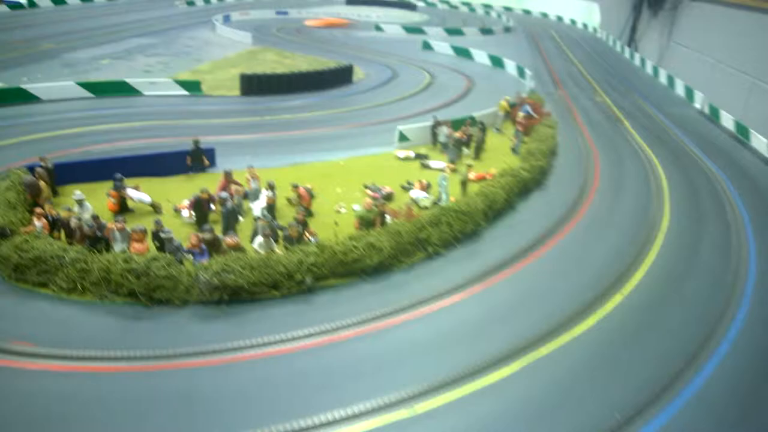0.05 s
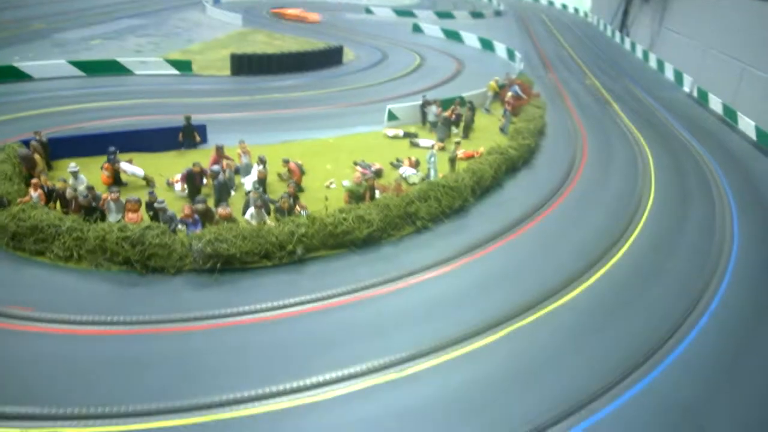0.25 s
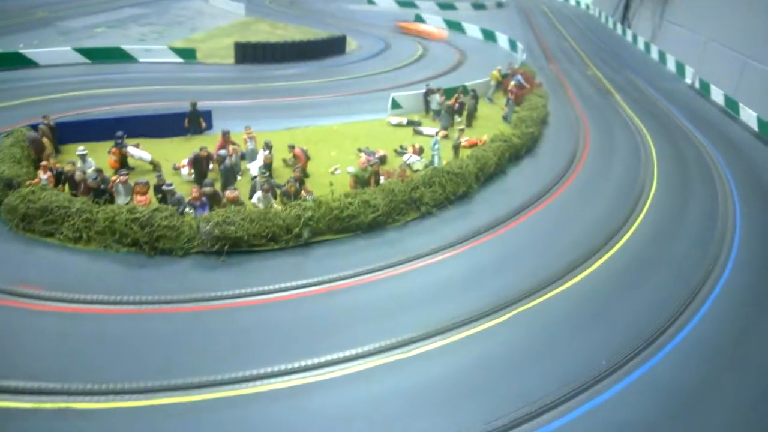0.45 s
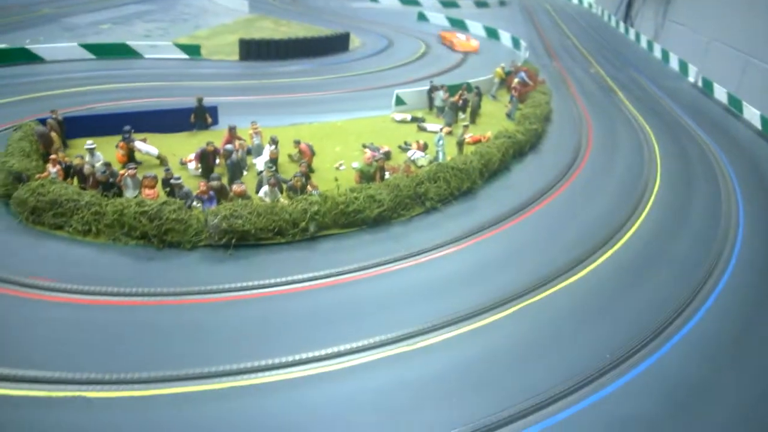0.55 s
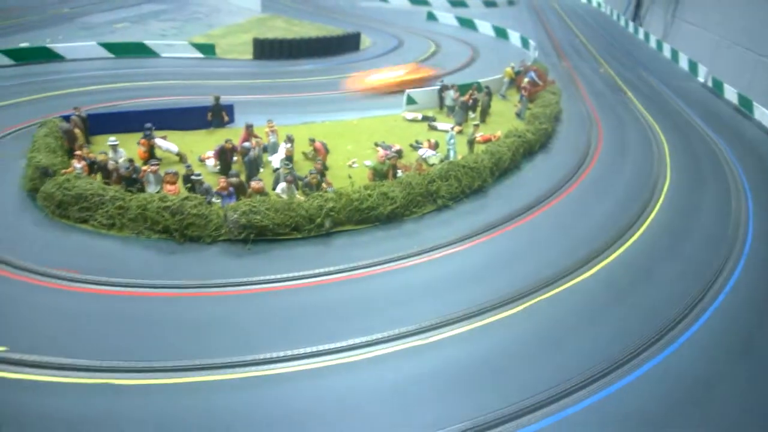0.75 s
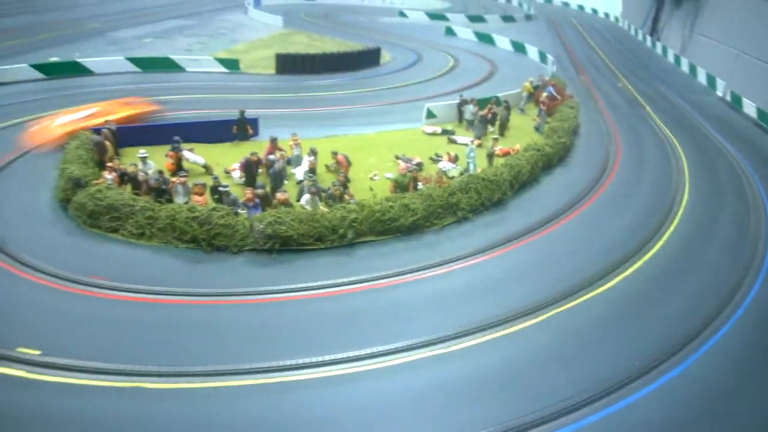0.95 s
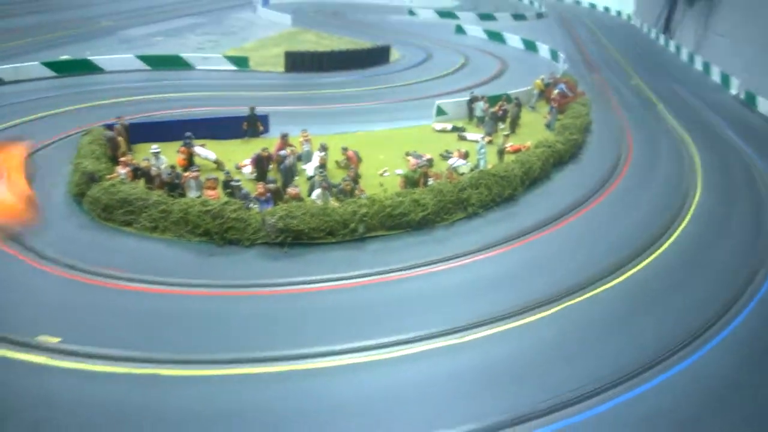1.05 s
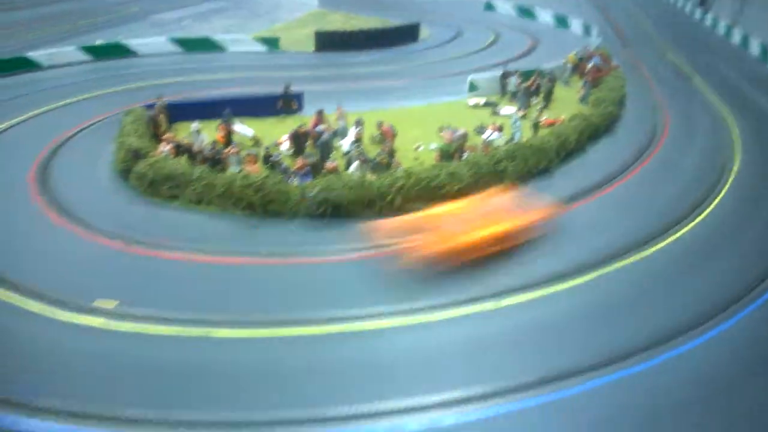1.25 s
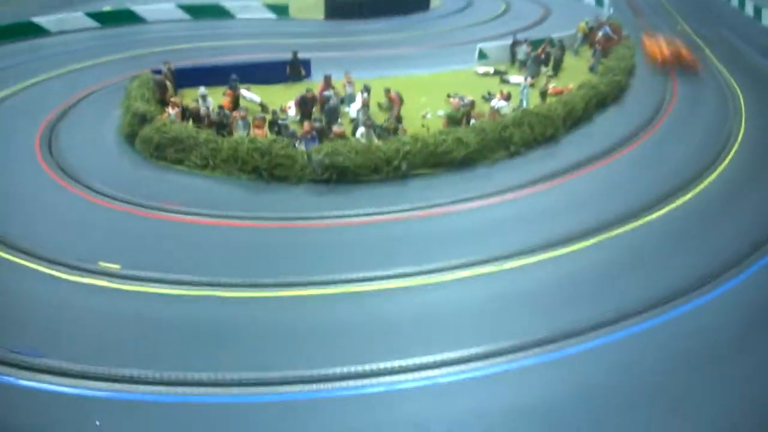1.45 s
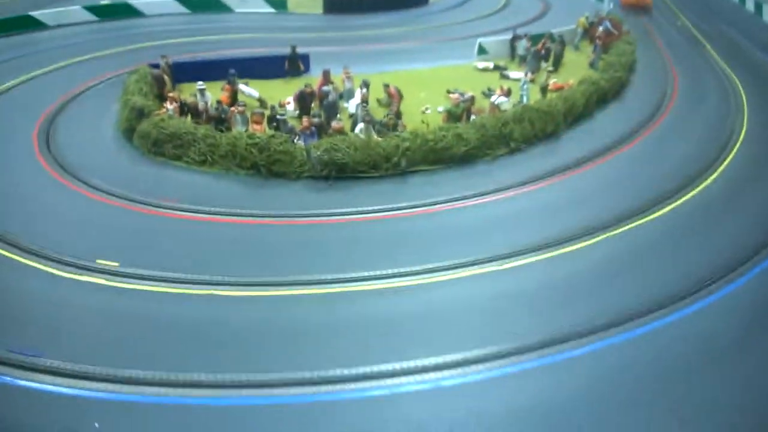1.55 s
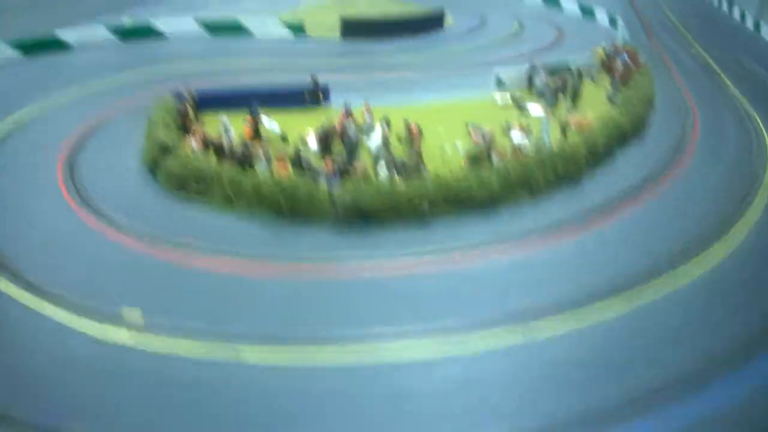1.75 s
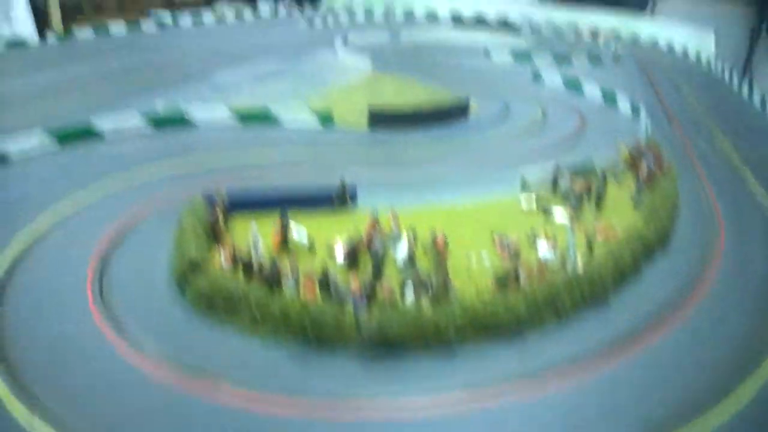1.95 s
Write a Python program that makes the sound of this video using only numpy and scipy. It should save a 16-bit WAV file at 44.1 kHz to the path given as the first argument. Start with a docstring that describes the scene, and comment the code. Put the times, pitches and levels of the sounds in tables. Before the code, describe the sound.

A toy slot car whirs and rattles along a model track in a small room, over a low hum. Its whine rises at first, dips around 0.5 seconds and again near 1 second, with tiny squeaks. From about 1.2 to 1.6 seconds it speeds close past the microphone, loudest here, with a scraping hiss and quick clicks at the track joints. It then drops in pitch and fades by 2 seconds.

```python
"""A toy slot car whines and rattles round a model track, slowing for the bends and rushing
close past a mono microphone in a small room. Its gear teeth sing and ring the plastic chassis,
the pickup braids scrape along the rails, the guide clatters at the track joints and the wheels
rumble on the hollow board. Behind the car lie a deep hum and the faint air of the room."""
import sys
import numpy as np
from scipy import signal
from scipy.fft import rfft, irfft
from scipy.io import wavfile

SR = 44100
rng = np.random.default_rng(int(sys.argv[2]) if len(sys.argv) > 2 else 0)


def waveform_to_disk(signal):
    """Save audio, clipped to [-1, 1], as 16-bit WAV at the path in sys.argv[1]."""
    frames = np.transpose(np.atleast_2d(signal))
    scaled = np.clip(frames, -1, 1) * 32767
    samples = np.round(scaled).astype(np.int16)
    wavfile.write(sys.argv[1], SR, samples)


N = 88200
T = np.arange(N) / SR

# motor speed along the lap (time [s], tooth rate [Hz])
TOOTH_RATE = [(0, 1420), (.13, 1950), (.33, 1647), (.47, 1146), (.52, 976), (.59, 1020), (.68, 1246),
              (.8, 1417), (.88, 1475), (.91, 1144), (.97, 1030), (1.04, 1304), (1.18, 1347), (1.25, 1538),
              (1.36, 1696), (1.46, 2069), (1.55, 1641), (1.655, 1561), (1.69, 1316), (1.78, 1064),
              (1.93, 1030), (2, 1038)]
# the car's rattle at the microphone (time [s], low ring [dB], high ring [dB], rasp [dB])
RATTLE_LEVELS = [(0, -46.5, -42.5, -46.5), (.11, -49, -52, -48.5), (.2, -47.5, -43, -47.5),
                 (.31, -52.5, -49, -47.5), (.36, -38, -49, -42), (.42, -49, -46, -43.5),
                 (.47, -54, -50, -58), (.54, -53, -56, -55), (.58, -53, -46, -55), (.63, -44.5, -46, -43),
                 (.76, -43.5, -46, -44.5), (.84, -44.5, -41.5, -41), (.9, -46.5, -51, -47),
                 (.95, -52, -53, -44.5), (1.02, -40.5, -40, -44.5), (1.1, -37.5, -42, -35),
                 (1.15, -39.5, -57, -34), (1.22, -32.5, -30.5, -33.5), (1.3, -33, -32.5, -41.5),
                 (1.38, -34, -33, -35.5), (1.44, -33, -34.5, -36.5), (1.51, -40, -49.5, -32.5),
                 (1.6, -43, -35, -39), (1.68, -41.5, -49.5, -44.5), (1.77, -50, -38.5, -50),
                 (1.8, -47, -50, -63), (1.88, -47.5, -48, -50), (2, -52.5, -52, -48.5)]
# chassis resonances (frequency before shift [Hz], width [Hz], relative level [dB])
CHASSIS_MODES = [(1814, 770, -7), (3395, 280, 0.5), (3737, 490, 2.5), (6345, 525, 7), (6770, 510, -2),
                 (8930, 480, -2), (12500, 490, -7.5)]
# their shift as the car turns towards the microphone and away (time [s], factor [ratio])
MODE_SHIFT = [(0, 1), (.3, 0.99), (.6, 0.98), (.72, 0.97), (.84, 1.015), (.95, 1.05), (1.08, 1),
              (1.23, 1.05), (1.32, 0.983), (1.43, 1.005), (1.6, 0.972), (1.76, 1.02), (2, .98)]
# rasp through the shell (frequency [Hz], relative level [dB])
SHELL_SPECTRUM = [(200, -61), (800, -21), (1150, 2.5), (2100, 5), (2800, 8.5), (3600, -1), (4500, 10),
                  (5300, 10), (6500, -4), (8000, 9), (10500, -9.5), (16000, -42)]
# chirps of loose parts (frequency [Hz], relative level [dB])
CHIRP_SPECTRUM = [(1800, -13.5), (2800, -2), (3900, -12), (4600, -0.5), (5300, -5), (5700, -5.5),
                  (6500, 4.5), (7300, -1), (8200, -7), (9300, 1.5)]
# gear whine (time [s], tooth tone [dB], octave [dB], third harmonic [dB])
WHINE_LEVELS = [(0, -60, -79, -73), (.29, -57, -81, -76), (.42, -72, -76, -68), (.48, -52.5, -68, -67),
                (.56, -69, -64, -66), (.61, -44, -54.5, -45), (.7, -55.5, -57, -65), (.85, -51, -54, -72),
                (.91, -46.5, -63, -78), (.97, -49.5, -45, -41.5), (1.1, -48, -49, -76),
                (1.19, -43, -41, -36), (1.26, -40.5, -73, -48), (1.37, -41.5, -52, -38),
                (1.5, -89, -56, -47), (1.64, -83.5, -40.5, -67), (1.7, -51, -43.5, -55),
                (1.77, -82, -50.5, -51), (1.82, -65, -60, -66), (2, -78, -55, -55)]
# thin fourth harmonic as the car coasts away (time [s], level [dB])
COAST_LEVEL = [(0, -66), (1.75, -97), (1.82, -51.5), (2, -49.5)]
# chassis squeals (middle [s], half length [s], pitch [Hz], level [dB])
SQUEAL_EVENTS = [(.415, .028, 5110, -47), (.612, 0.0038, 6280, -36.5), (0.686, 0.0078, 6590, -37.5),
                 (0.737, 0.019, 6640, -41), (0.81, .008, 7100, -38.5), (1.07, 0.024, 6690, -37),
                 (1.17, 0.006, 6500, -33.5), (1.208, .008, 7170, -47), (1.227, .008, 6510, -29.5),
                 (1.332, .008, 6290, -31), (1.346, 0.0068, 1700, -34), (1.387, 0.0029, 3565, -27.5),
                 (1.422, 0.019, 3766, -32), (1.455, 0.016, 6480, -30), (1.49, 0.002, 6460, -21.5),
                 (1.539, 0.0029, 6420, -32.5), (1.574, 0.015, 3300, -34.5), (1.582, 0.02, 2690, -37.5),
                 (1.625, 0.017, 6130, -36)]
# braids scraping the rails (time [s], level before trim [dB])
SCRAPE_LEVEL = [(0, -40), (.14, -47.5), (.35, -45), (.43, -39.5), (.48, -52.5), (.55, -44.5), (.61, -40.5),
                (.77, -45), (.805, -35.5), (.845, -28.5), (.885, -41), (.95, -52), (1.04, -48), (1.16, -37),
                (1.25, -26.5), (1.31, -44), (1.38, -27), (1.52, -35), (1.64, -43), (1.72, -41), (2, -42.5)]
# colour of that scrape (frequency [Hz], relative level [dB])
SCRAPE_SPECTRUM = [(300, -31.5), (2000, -28), (5000, -8), (8100, -4), (9300, -4), (10300, 0), (11700, 0.5),
                   (13000, -2.5), (14500, -10), (16000, 1)]
# sizzle of the braids close to the microphone (time [s], level [dB])
SIZZLE_LEVEL = [(0, -57), (.2, -59), (.38, -46), (.48, -78), (.62, -52), (.84, -45), (.885, -51),
                (.94, -50.5), (1.01, -47), (1.15, -45), (1.24, -30.5), (1.31, -23.5), (1.37, -38.5),
                (1.5, -40.5), (1.64, -40), (1.72, -65), (2, -68)]
# colour of that sizzle (frequency [Hz], relative level [dB])
SIZZLE_SPECTRUM = [(300, -60), (9500, -11), (11500, -3), (13000, 0), (14500, 1), (16000, -8.5)]
# clatter at the track joints (time [s], length [s], chassis ring [dB], scrape [dB])
JOINT_EVENTS = [(0.2407, 0.0096, -35, -51), (0.2933, 0.0078, -35, -43), (0.331, 0.012, -39.5, -40),
                (.8061, 0.008, -58, -41), (1.0675, 0.0081, -38, -53), (1.1674, .012, -36, -60),
                (1.296, 0.0084, -42, -20), (1.3806, .007, -28.5, -52), (1.4142, 0.0065, -27, -43),
                (1.4466, 0.014, -30, -38), (1.487, 0.0037, -26.5, -31), (1.513, 0.0047, -27.5, -30),
                (1.557, 0.004, -32, -55), (1.766, .012, -42.5, -59)]
# rumble of the track board (time [s], level before trim [dB])
RUMBLE_LEVEL = [(0, -55.5), (.12, -52), (.24, -57), (.33, -50), (.39, -40.5), (.46, -58), (.53, -70),
                (.62, -50), (.76, -55.5), (.85, -61.5), (.93, -49.5), (1.05, -53), (1.2, -50), (1.45, -55),
                (1.58, -45.5), (1.64, -52.5), (1.7, -44.5), (1.8, -55.5), (2, -58)]
# colour of the board (frequency [Hz], relative level [dB])
BOARD_SPECTRUM = [(30, -16), (70, -10.5), (140, 2), (200, -9.5), (270, -10), (340, -4.5), (480, -15),
                  (700, -13), (1000, -11), (1500, -13.5), (3000, -28), (16000, -83)]
# wheels knocking on the board (time [s], pitch [Hz], width [Hz], level [dB])
WHEEL_KNOCKS = [(0.034, 175, 12, -43), (0.237, 1740, 900, -42.5), (0.288, 1630, 460, -40),
                (0.347, 153, 63, -40.5), (.378, 280, 220, -46), (0.427, 146, 80, -44.5),
                (0.719, 102, 37, -49), (1.541, 274, 70, -41.5), (1.576, 834, 580, -38.5),
                (1.678, 1295, 620, -41), (1.719, 138, 23, -46.5)]
# decay of the small room (frequency [Hz], time to fall 60 dB [s])
ROOM_DECAY = [(100, 0.43), (1000, 0.51), (5000, 0.78), (16000, 0.42)]
# deep hum behind the car (time [s], level [dB])
HUM_LEVEL = [(0, -44), (.1, -47.5), (.26, -39), (.38, -45), (.46, -42.5), (.52, -43.5), (.65, -42),
             (1, -43.5), (1.15, -50), (1.38, -41.5), (1.6, -51.5), (1.74, -44.5), (2, -46)]
# air of the room (frequency [Hz], relative level [dB])
AIR_SPECTRUM = [(20, -8), (60, 5.5), (130, -1.5), (220, -6), (500, -12.5), (1500, -23.5), (6000, -49.5),
                (16000, -26)]


def gears(cycles, teeth=9, lope=0.048, blow_share=0.2, surge_hz=45, chirp_db=-1.5):
    """Each tooth strikes and rubs: both ring the chassis, and the rubbing rasps through the shell."""
    blows = tooth_blows(cycles)
    rub = unit(grains(per_s=9000, spread_db=2) * (1 + np.exp(-(cycles % 1) * 2)))
    drive = np.sqrt(blow_share) * blows + np.sqrt(1 - blow_share) * rub
    low_ring = chassis(drive * surge(depth_db=3, hz=surge_hz), CHASSIS_MODES[:3])
    high_ring = chassis(drive * surge(depth_db=3, hz=surge_hz), CHASSIS_MODES[3:])
    rasp = unit(colour(rub, SHELL_SPECTRUM) + amp(chirp_db) * chirps())
    rattle = sum(amp(curve(RATTLE_LEVELS, column)) * layer
                 for column, layer in enumerate([low_ring, high_ring, rasp], 1))
    swell = 1 + lope * np.sin(2 * np.pi * cycles / teeth)  # once per turn of the gear
    return swell * surge(depth_db=0.32, hz=surge_hz) * rattle


def tooth_blows(cycles, spread_db=1.5):
    """One uneven blow per tooth, shared between the two nearest samples."""
    tooth = cycles.astype(int)
    at = np.flatnonzero(np.diff(tooth))
    late = (tooth[at + 1] - cycles[at]) / (cycles[at + 1] - cycles[at])
    size = amp(-spread_db * rng.uniform(-1, 1, len(at)))
    blows = np.bincount(at, size * (1 - late), N) + np.bincount(at + 1, size * late, N)
    return unit(blows - blows.mean())


def chassis(x, modes=CHASSIS_MODES, skirt=4.5):
    """The plastic body rings; a second, wider filter keeps the valleys between resonances dark."""
    shift, out = curve(MODE_SHIFT), np.zeros(N)
    for hz, width, db in modes:
        ring = resonate(x, hz * shift, width)
        out += amp(db) * resonate(ring, hz * shift, width * skirt)
    return unit(out)


def chirps(per_s=490, half_s=0.0017, glide_per_s=1.4):
    """Loose parts sing for a few milliseconds each, at scattered pitches."""
    t = np.arange(-1000, 1000) / SR
    envelope = np.exp(-(t / half_s) ** 2 / 2)
    lowest, highest = CHIRP_SPECTRUM[0][0], CHIRP_SPECTRUM[-1][0]
    out = np.zeros(N + len(t))
    for when, pitch, size in rng.random((int(per_s * N / SR), 3)):
        hz, at = lowest + pitch * (highest - lowest), int(when * N)
        tone = np.sin(2 * np.pi * hz * t * (1 + glide_per_s * t))
        out[at:at + len(t)] += (0.5 + size) * amp(read(CHIRP_SPECTRUM, hz)) * envelope * tone
    return unit(out[len(t) // 2:][:N])


def whine(cycles, steady_cycles, flutter=0.92, coast_flutter=0.78, flutter_hz=83.5):
    """The tooth tone and its overtones flutter as the car shakes."""
    fourth = np.sin(8 * np.pi * steady_cycles) * (1 + coast_flutter * drift(flutter_hz))
    out = amp(curve(COAST_LEVEL)) * unit(fourth)
    for harmonic in (1, 2, 3):
        shake = 1 + flutter * (drift(flutter_hz) + 1j * drift(flutter_hz))  # in level and phase
        tone = (shake * np.exp(2j * np.pi * harmonic * cycles)).real
        out += amp(curve(WHINE_LEVELS, harmonic)) * unit(tone)
    return out


def squeals(waver_hz=130):
    """The chassis sings out for an instant on one wavering pitch."""
    out = np.zeros(N)
    for middle, half, hz, db in SQUEAL_EVENTS:
        cycles = np.cumsum(hz + waver_hz * drift(waver_hz)) / SR
        envelope = np.exp(-((T - middle) / half) ** 2 / 2)
        out += amp(db) * envelope * unit(np.sin(2 * np.pi * cycles))
    return out


def braids(per_s=26000, spread_db=1.0, scrape_trim_db=-2.5):
    """The pickup braids scrape and spark along the rails, brighter close to the microphone."""
    chatter = surge(depth_db=4.5, hz=220)
    scrape = amp(curve(SCRAPE_LEVEL) + scrape_trim_db) * colour(grains(per_s, spread_db), SCRAPE_SPECTRUM)
    sizzle = amp(curve(SIZZLE_LEVEL)) * colour(grains(per_s, spread_db), SIZZLE_SPECTRUM)
    return chatter * (scrape + sizzle)


def joints(fade_s=0.0013):
    """The guide chatters briefly over each joint in the slot."""
    clicks = grains(per_s=5000, spread_db=1.5)
    ring, scrape = chassis(clicks), colour(clicks, SCRAPE_SPECTRUM)
    out = np.zeros(N)
    for start, length, ring_db, scrape_db in JOINT_EVENTS:
        gate = (T >= start) * np.exp(-np.maximum(T - start - length, 0) / fade_s)
        out += gate * (amp(ring_db) * ring + amp(scrape_db) * scrape)
    return out


def board(rumble_trim_db=1, knock_rise_s=0.013):
    """The wheels rumble on the hollow track and knock at its bumps."""
    rumble = colour(grains(per_s=1500, spread_db=5.5), BOARD_SPECTRUM)
    out = amp(curve(RUMBLE_LEVEL) + rumble_trim_db) * rumble
    for start, hz, width, db in WHEEL_KNOCKS:
        age = np.maximum(T - start, 0) / knock_rise_s
        ring = resonate(resonate(rng.standard_normal(N), hz, width), hz, 2 * width)
        out += amp(db) * age * np.exp(1 - age) * unit(ring)
    return out


def room(x, patterns=5, cycle_hz=4.0, tail_db=-15, early_db=-8.5):
    """Direct sound plus reflections, which fade from one pattern to the next as the car moves."""
    out = x
    for k in range(patterns):
        away = abs((T * cycle_hz * patterns - k + patterns / 2) % patterns - patterns / 2)
        fade = np.cos(np.pi / 2 * np.minimum(away, 1))
        out = out + signal.fftconvolve(x * fade, reflections(tail_db, early_db))[:N]
    return out / np.sqrt(1 + amp(tail_db) ** 2 + amp(early_db) ** 2)


def reflections(tail_db, early_db, count=8, early_s=0.008):
    """A few echoes reach the microphone from the track and the near wall, then a short tail."""
    n = SR // 3
    noise = rng.standard_normal(n) * (np.arange(n) > SR * early_s / 2)
    hz, t, bands = signal.stft(noise, SR, nperseg=256)
    decay = amp(-60 * t / read(ROOM_DECAY, hz)[:, None])
    tail = signal.istft(bands * decay, SR, nperseg=256)[1][:n]
    echo = amp(tail_db) * tail / np.linalg.norm(tail)
    arrivals = (SR * early_s * rng.uniform(0.1, 1, count)).astype(int)
    echo[arrivals] += amp(early_db) * rng.choice([-1, 1], count) / np.sqrt(count)
    echo[0] = 0
    return echo


def room_tone(hum_hz=39.7, waver=0.05, waver_hz=8, air_db=-52.5):
    """A deep wavering hum and the faint air of the room."""
    cycles = np.cumsum(hum_hz * (1 + waver * drift(waver_hz))) / SR
    hum = amp(curve(HUM_LEVEL)) * unit(np.sin(2 * np.pi * cycles))
    return hum + amp(air_db) * colour(rng.standard_normal(N), AIR_SPECTRUM)


def amp(db):
    """Decibels to gain."""
    return 10 ** (np.asarray(db) / 20)


def unit(x):
    """Scales to rms 1."""
    return x / np.sqrt(np.mean(x ** 2) + 1e-20)


def curve(points, column=1):
    """One column of a time table at every sample."""
    table = np.array(points, float)
    return np.interp(T, table[:, 0], table[:, column])


def read(points, hz):
    """Reads a frequency table on a log axis."""
    f, value = np.transpose(points)
    return np.interp(np.log(hz + 1), np.log(f + 1), value)


def colour(x, points):
    """Gives x a spectrum, at rms 1."""
    gain = amp(read(points, np.fft.rfftfreq(N, 1 / SR)))
    return unit(irfft(rfft(x) * gain, N))


def drift(hz):
    """Smooth random motion up to about hz, at rms 1."""
    f = np.fft.rfftfreq(N, 1 / SR)
    return unit(irfft(rfft(rng.standard_normal(N)) * (f > hz / 10) / (1 + (f / hz) ** 2), N))


def surge(depth_db, hz):
    """A gain that swells and dips at random, within depth_db."""
    return amp(depth_db * np.tanh(drift(hz)))


def resonate(x, hz, width):
    """A resonance of gain 1 that can follow a pitch curve."""
    carrier = np.exp(2j * np.pi * np.cumsum(hz * np.ones(N)) / SR)
    pole = np.exp(-np.pi * width / SR)
    return 2 * (carrier * signal.lfilter([1 - pole], [1, -pole], x / carrier + 1e-18)).real


def grains(per_s, spread_db):
    """Random clicks of uneven size."""
    size = amp(spread_db * np.minimum(rng.exponential(1, N), 4)) * rng.choice([-1, 1], N)
    return unit(size * (rng.random(N) < per_s / SR))


def scene(wobble_depth=0.02364, coast_depth=0.0016, wobble_hz=70.5):
    """The car in the room at one microphone; one motor speed drives both rattle and whine."""
    rate, wobble = curve(TOOTH_RATE), drift(wobble_hz)
    cycles = np.cumsum(rate * (1 + wobble_depth * wobble)) / SR  # one cycle per tooth
    steady_cycles = np.cumsum(rate * (1 + coast_depth * wobble)) / SR
    car = gears(cycles) + whine(cycles, steady_cycles) + squeals() + braids() + joints() + board()
    mono = room(car) + room_tone()
    return np.array([mono, mono])


def record(dry):
    """The recorder cuts the treble above 15780 Hz."""
    lowpass = signal.firwin(1023, 15780, window=("kaiser", 9), fs=SR)
    return signal.oaconvolve(dry, lowpass[None], "same")


dry = scene()
out = record(dry)
waveform_to_disk(out)
```